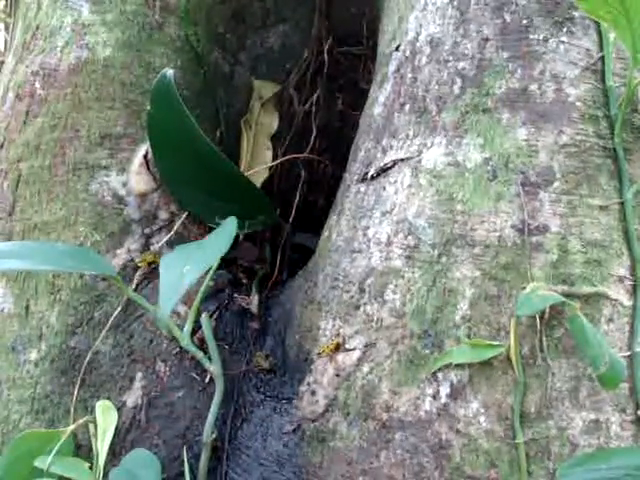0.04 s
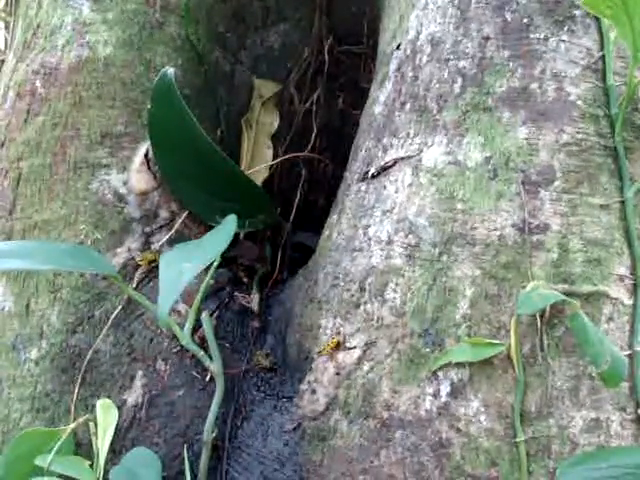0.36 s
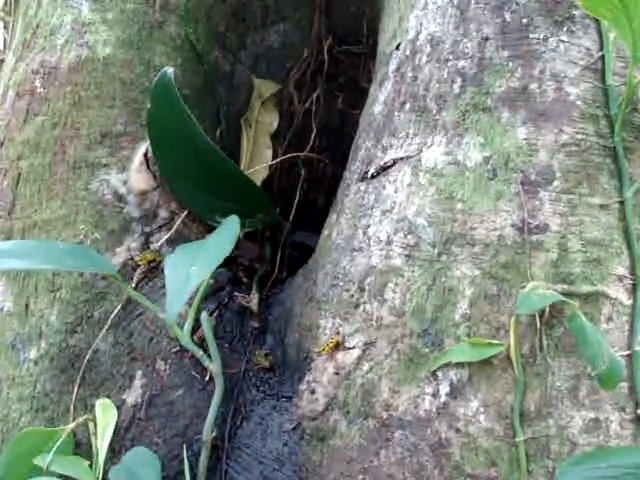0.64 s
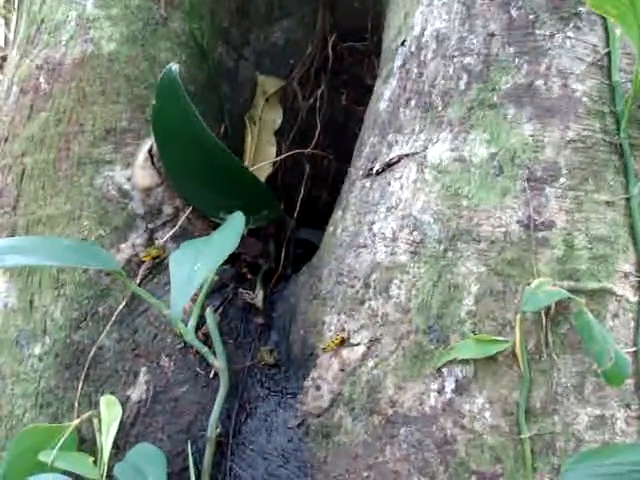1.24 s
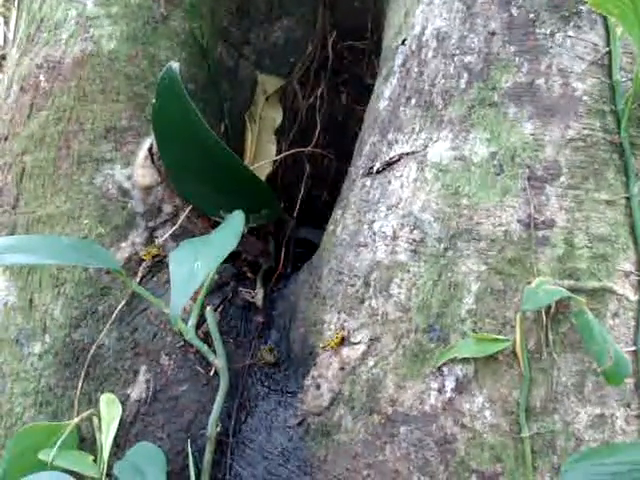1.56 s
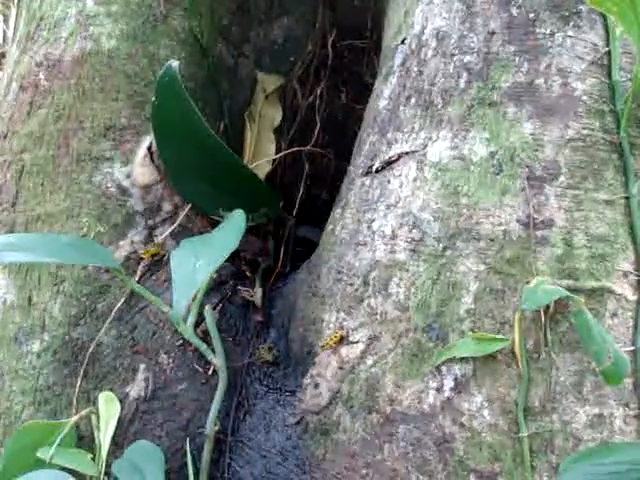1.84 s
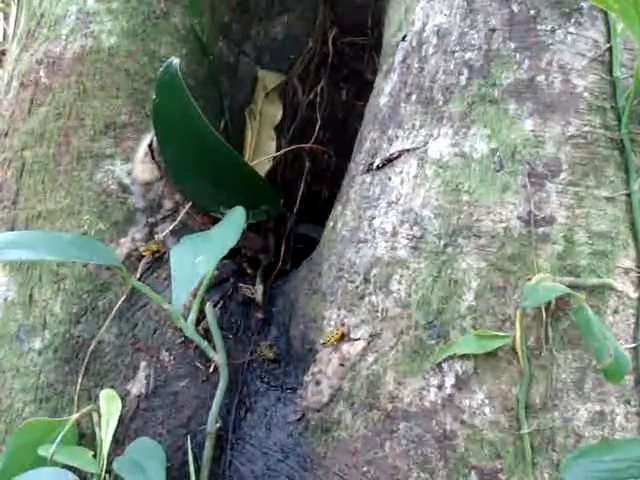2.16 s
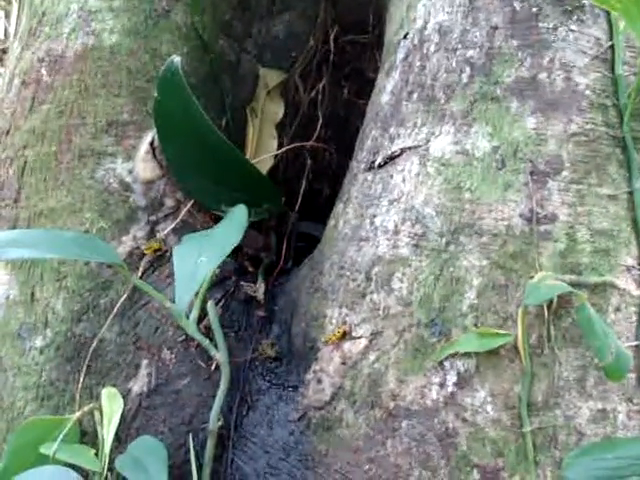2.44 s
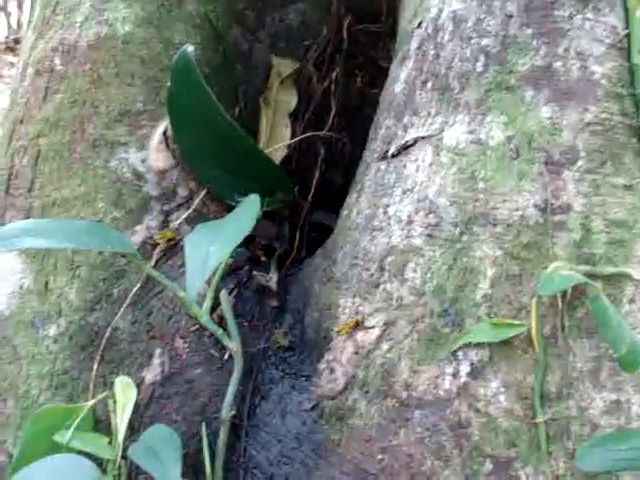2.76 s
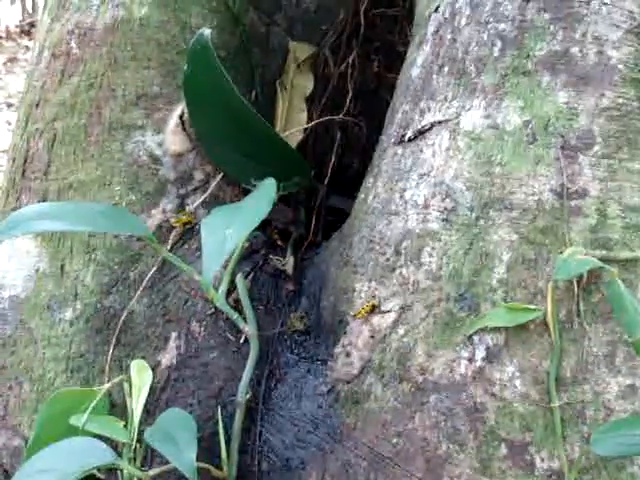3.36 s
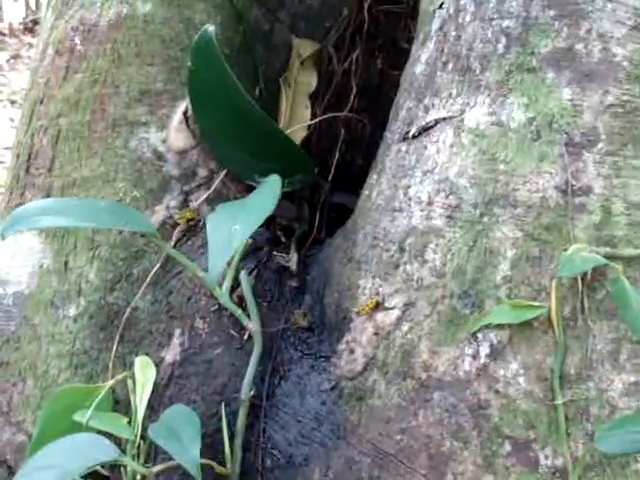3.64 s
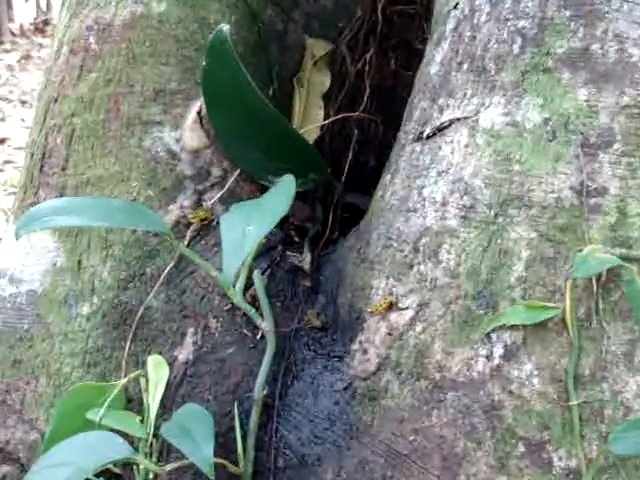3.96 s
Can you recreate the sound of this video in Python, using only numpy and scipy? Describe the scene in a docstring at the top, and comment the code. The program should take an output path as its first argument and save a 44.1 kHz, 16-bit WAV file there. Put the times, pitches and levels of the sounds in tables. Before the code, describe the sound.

Quick, buzzy frog chirps repeat close by, with insects hissing in the surrounding forest.

```python
"""At the foot of a forest tree, two small frogs call: the near one chirps about seven times a second,
the second joins in at times with a rougher rasp. Each call is a short, quickening run of clicks
that rings the frog's throat and vocal sac near 5 kHz. Insects hiss and buzz high up all around,
over a low bed of distant surf or wind. One light tick and a few soft thumps come near the end."""
import sys
import numpy as np
from scipy import signal
from scipy.fft import rfft, irfft
from scipy.io import wavfile

SR = 44100
rng = np.random.default_rng(int(sys.argv[2]) if len(sys.argv) > 2 else 0)


def inscribe(sig):
    """Save sig as 16-bit PCM at rate SR to the path in sys.argv[1].

    A 1-D sig is mono; a 2-D sig holds one channel per row.
    Samples are clipped to [-1, 1] before scaling.
    """
    pcm = np.round(np.clip(np.atleast_2d(sig).T, -1, 1) * 32767)
    wavfile.write(sys.argv[1], SR, pcm.astype(np.int16))


N = 4 * SR

# near frog's cues: t/s, first click gap/ms, ratio of each gap to the last, length/ms, relative level/dB
CHIRP_CUES = [(0.0166, 5.7, 0.64, 16.6, -8), (.1528, 6.7, 0.71, 20.6, -8), (.3158, 7.4, 0.73, 17.5, -7),
              (0.6022, 6.7, 0.6, 27, -11), (0.7471, 4.5, 0.54, 7.8, -8), (0.8868, 5.8, 0.61, 17, -9.5),
              (1.0286, 6, 0.76, 18.3, -8.5), (1.1694, 7.6, 0.57, 18.7, -9.5),
              (1.325, 5.7, 0.83, 22.1, -7.5), (1.5002, 6.7, 0.63, 19.8, -9.5),
              (1.6377, 6.4, 0.61, 17, -7.5), (1.774, 7.5, 0.48, 18.3, -8.5), (1.9079, 5.6, 0.83, 22, -7.5),
              (2.0507, 5.7, 0.77, 24.2, -8), (2.1956, 8.4, 0.6, 21.8, -8), (2.3378, 7.1, .66, 23, -8),
              (2.4798, 7.9, .46, 16.1, -8.5), (2.6138, 10, 0.51, 20.6, -8.5), (2.7612, 6.3, .78, 27, -6),
              (2.9082, 9.1, 0.62, 24.4, -8), (3.058, 8.3, 0.66, 21.8, -7), (3.2075, 7.6, 0.53, 19.6, -8.5),
              (3.3625, 7.3, 0.74, 28.4, -7), (3.5059, 7.5, .71, 26.3, -6.5), (3.6515, 6.4, 0.8, 25.7, -5.5),
              (3.7997, 7.9, 0.78, 27.2, -6.5), (3.9654, 6.3, 0.81, 26, -7)]
# second frog's cues: t/s, first click gap/ms, length/ms, relative level/dB, tilt/(dB per octave)
RASP_CUES = [(0.025, 4.9, 31.7, -20, -15), (.164, 5.4, 33.5, -21, -7), (0.313, 4.9, 32, -19, 1),
             (0.4513, 5.8, 34, -19.5, -9), (0.599, 4.6, 34.5, -17.5, -6.5), (.755, 4.8, 34, -15.5, 4.5),
             (1.192, 4.3, 36, -29, -25), (1.365, 5.2, 36, -25, -17), (2.761, 4.8, 37, -16.5, 4),
             (2.93, 4.5, 35, -22, -15), (3.07, 4.9, 40.6, -16, 0.5), (3.238, 3.2, 36, -14, 6.5)]
# click envelope through a call: share of its length, relative level/dB
CHIRP_ENVELOPE = [(0, 1), (.55, 4), (.85, 4.5), (1, -2.5)]
RASP_ENVELOPE = [(0, 2.5), (.55, 5), (.85, 9), (1, 3)]
# click-to-click scatter: share of the gap, level/dB, share of each resonance's pitch
CHIRP_SCATTER = (0.014, 1.2, 0.017)
RASP_SCATTER = (.06, 1.44, .022)
# throat and vocal sac resonances: f/Hz, width/Hz, relative level/dB
CHIRP_THROAT = [(3700, 350, -21), (4750, 430, -2), (5061, 390, 13.5), (5330, 360, 1), (5800, 550, -17)]
RASP_THROAT = [(3546, 330, 1.5), (4995, 490, 10.5), (5350, 500, -9), (6300, 780, -10.5)]
# tone of the insect hiss and buzz: f/Hz, relative level/dB
INSECT_SPECTRUM = [(6000, -54), (6650, -21), (7100, -7), (7500, -2), (8100, -0.5), (8700, 3), (9300, 4.5),
                   (9850, 5), (10300, -10)]
# nearest buzzing insects: stroke rate/Hz
STROKE_RATES = [37.5, 37.8]
# single shrill insects: f/Hz, level/dB
SHRILL_VOICES = [(7090, -54.5), (7476, -55), (7915, -48), (8430, -47.5), (8918, -43.5), (9165, -57),
                 (9420, -43.5), (9848, -42.5)]
# tone of the surf or wind: f/Hz, relative level/dB
WASH_SPECTRUM = [(25, -17), (50, -9.5), (75, -1.5), (120, -0.5), (200, -3.5), (285, 0), (370, -3.5),
                 (460, 0), (650, 0.5), (1000, -4.5), (1600, -8.5), (2600, -11.5), (4000, -15),
                 (6500, -19.5)]
# its swell: t/s, relative level/dB
WASH_ENVELOPE = [(0.0, -47), (1.83, -42.5), (3.01, -45), (3.82, -43), (3.83, -45), (3.99, -43), (4.0, -45)]
# soft thumps under the last chirps: t/s, level/dB
THUMP_CUES = [(3.528, -41.5), (3.672, -41), (3.822, -38), (3.985, -39)]

CHIRP_TRIM_DB, RASP_TRIM_DB, WASH_TRIM_DB = -1.5, -2.1, 2.5
VOICE_LOW_HZ, VOICE_HIGH_HZ = 3200, 6410
LEAD_MS, LEAD_DB = 1.1, -9   # a weak click runs just ahead of each strong one


def near_frog():
    """The lead voice: short, bright chirps of a handful of clicks."""
    out = np.zeros(N)
    for s, first_ms, shrink, length_ms, db in CHIRP_CUES:
        chirp = frog_call(CHIRP_THROAT, CHIRP_ENVELOPE, CHIRP_SCATTER, first_ms, length_ms,
                          shrink, min_gap_ms=1.8, tilt_db=0)
        add(out, s - LEAD_MS / 1000, from_db(db + CHIRP_TRIM_DB) * chirp)
    return out


def second_frog():
    """The supporting voice: longer, rougher click runs, duller when weak."""
    out = np.zeros(N)
    for s, first_ms, length_ms, db, tilt_db in RASP_CUES:
        rasp = frog_call(RASP_THROAT, RASP_ENVELOPE, RASP_SCATTER, first_ms, length_ms,
                         shrink=0.86, min_gap_ms=1.7, tilt_db=tilt_db)
        add(out, s - LEAD_MS / 1000, from_db(db + RASP_TRIM_DB) * rasp)
    return out


def frog_call(throat, envelope, scatter, first_ms, length_ms, shrink, min_gap_ms, tilt_db, count=24):
    """A run of clicks that tightens towards a shortest gap while its level swells and eases."""
    gap_spread, spread_db, pitch_spread = scatter
    gaps_ms = np.maximum(first_ms * shrink ** np.arange(count), min_gap_ms)
    gaps_ms *= 1 + gap_spread * rng.standard_normal(count)
    starts_ms = np.cumsum(gaps_ms) - gaps_ms
    swell_db = np.interp(starts_ms / length_ms, *np.transpose(envelope))
    gains = from_db(swell_db + spread_db * rng.standard_normal(count))
    pitch = 1 + 0.012 * rng.standard_normal()   # each call is slightly detuned
    out = np.zeros(4000)
    for ms, gain, slip in zip(starts_ms, gains, rng.random(count)):
        ring = throat_ring(throat, tilt_db, pitch, pitch_spread)
        if ms <= length_ms:
            add(out, (ms + 0.2 * slip * LEAD_MS) / 1000, gain * from_db(LEAD_DB) * ring)
            add(out, (ms + LEAD_MS) / 1000, gain * ring)
    return out


def throat_ring(throat, tilt_db, pitch, pitch_spread):
    """One click rings the throat, whose resonances shift a little each time; peak 1."""
    hz, width_hz, db = np.transpose(throat)[:, :, None]
    t = np.arange(400) / SR
    polarity = (-1) ** np.arange(len(hz))[:, None]
    gains = from_db(db + tilt_db * np.log2(hz / VOICE_LOW_HZ)) * width_hz * polarity
    hz = hz * (pitch + pitch_spread * rng.standard_normal(hz.shape))
    ring = np.sum(gains * np.exp(-np.pi * width_hz * t) * np.cos(2 * np.pi * hz * t), axis=0)
    return ring / np.abs(ring).max()


def body_radiation(x):
    """The frogs' tiny bodies radiate only between two steep band edges."""
    for edge_hz, kind in (VOICE_LOW_HZ, "high"), (VOICE_HIGH_HZ, "low"):
        x = signal.sosfilt(signal.butter(10, edge_hz, kind, fs=SR, output="sos"), x + 1e-18)
    return x


def forest_reverb(x, wet_db=-40, t60_s=0.6):
    """A faint, diffuse tail scattered by trunks and leaves."""
    t = np.arange(SR) / SR
    tail = rng.standard_normal(SR) * from_db(-60 * t / t60_s)
    return from_db(wet_db) * signal.fftconvolve(x, tail / np.linalg.norm(tail))[:N]


def insects():
    """The top layer: fluttering hiss, close buzzes, shrill voices and a far chorus lower in pitch."""
    hiss = from_db(-28 + drift(rate_hz=50)) * coloured(rng.standard_normal(N), INSECT_SPECTRUM)
    buzzes = from_db(-29.5) * rms_one(sum(insect_buzz(rate) for rate in STROKE_RATES))
    shrills = sum(from_db(db) * narrow_noise(hz, width_hz=29) for hz, db in SHRILL_VOICES)
    far_chorus = from_db(-51.5 + drift(rate_hz=18)) * narrow_noise(hz=5030, width_hz=490)
    return hiss + buzzes + shrills + far_chorus


def insect_buzz(rate_hz, ticks=90, wander=0.0006, throb=0.6):
    """One insect loops its own stroke of tiny ticks, swelling three times in each stroke."""
    phase = np.cumsum(rate_hz * (1 + wander * drift(rate_hz=2))) / SR
    places = rng.random(ticks)
    sizes = rng.standard_normal(ticks) * (1 + throb * np.cos(6 * np.pi * places))
    strokes = np.arange(int(phase[-1]) + 1)[:, None]
    tick_samples = np.searchsorted(phase, strokes + places).ravel()
    train = np.bincount(tick_samples, np.tile(sizes, len(strokes)), N)[:N]
    return coloured(train, INSECT_SPECTRUM)


def distant_wash():
    """The low bed: far surf or wind, swelling slowly."""
    swell_db = np.interp(np.arange(N) / SR, *np.transpose(WASH_ENVELOPE))
    return from_db(WASH_TRIM_DB + swell_db) * coloured(rng.standard_normal(N), WASH_SPECTRUM)


def thumps_and_tick(thump_s=0.0067, tick_hz=3100, tick_db=-23):
    """Small details: rounded pulses give soft, low thumps; one ringing impulse gives a light tick."""
    t = np.arange(N) / SR
    out = sum(from_db(db) * np.exp(-((t - s) / thump_s) ** 2) for s, db in THUMP_CUES)
    tick = resonate(signal.unit_impulse(SR), tick_hz, width_hz=450)
    tick = resonate(tick, tick_hz, width_hz=900)
    add(out, s=3.169, sound=from_db(tick_db) * tick / np.abs(tick).max())
    return out


def from_db(db):
    """Decibels to gain."""
    return 10 ** (np.asarray(db) / 20)


def rms_one(x):
    """Scale to unit rms."""
    return x / np.sqrt(np.mean(x ** 2) + 1e-20)


def drift(rate_hz):
    """A smooth random modulator; rms 1."""
    lowpass = signal.butter(2, rate_hz, fs=SR, output="sos")
    return rms_one(signal.sosfilt(lowpass, rng.standard_normal(N + SR))[SR:])


def resonate(x, hz, width_hz):
    """One resonance with gain 1 at its peak."""
    r = np.exp(-np.pi * width_hz / SR)
    feedback = [1, -2 * r * np.cos(2 * np.pi * hz / SR), r * r]
    return signal.lfilter(np.array([1, 0, -1]) * (1 - r * r) / 2, feedback, x + 1e-18)


def narrow_noise(hz, width_hz):
    """Noise twice through a resonance; rms 1."""
    band = resonate(rng.standard_normal(N + SR), hz, width_hz)
    return rms_one(resonate(band, hz, width_hz)[SR:])


def coloured(x, spectrum):
    """EQ a flat sound along a curve of f/Hz, relative level/dB; rms 1."""
    hz, db = np.transpose(spectrum)
    bins_hz = np.maximum(np.arange(N // 2 + 1) * SR / N, 1)
    gain = from_db(np.interp(np.log(bins_hz), np.log(hz), db, left=-np.inf))
    return rms_one(irfft(rfft(x) * gain, N))


def add(out, s, sound):
    """Mix a sound in at s seconds."""
    i = int(np.clip(s * SR, 0, N))
    out[i:i + len(sound)] += sound[:N - i]


def scene():
    """Frogs up front, the forest ambience behind; the same mix in both channels."""
    frogs = body_radiation(near_frog() + second_frog())
    mix = frogs + forest_reverb(frogs) + insects() + distant_wash() + thumps_and_tick()
    return np.tile(mix, (2, 1))


def record(dry, cutoff_hz=10040):
    """A steep high cut on the whole mix."""
    return signal.sosfilt(signal.ellip(14, 0.1, 85, cutoff_hz, fs=SR, output="sos"), dry)


dry = scene()
out = record(dry)
inscribe(out)
```